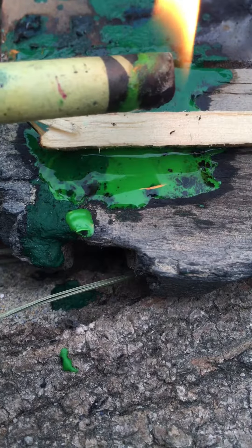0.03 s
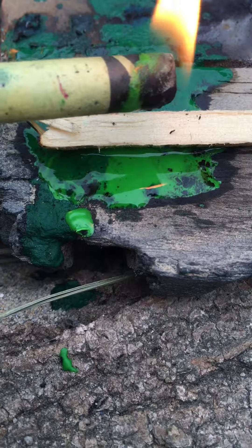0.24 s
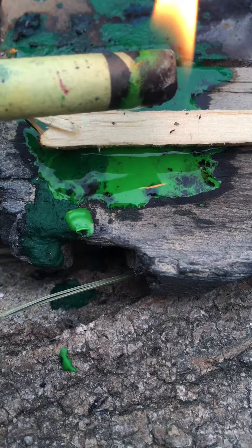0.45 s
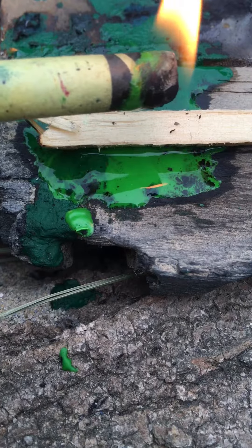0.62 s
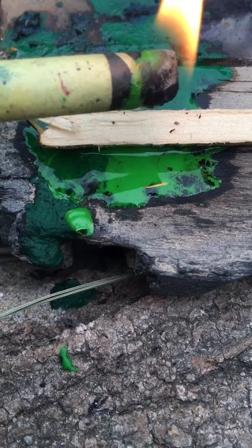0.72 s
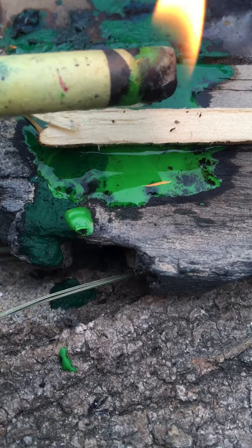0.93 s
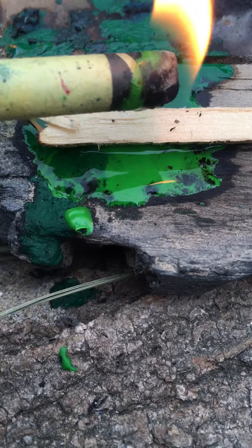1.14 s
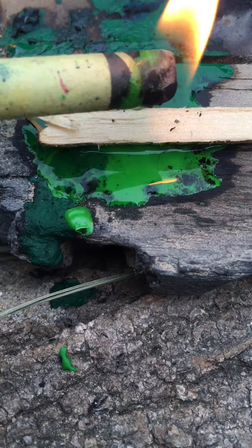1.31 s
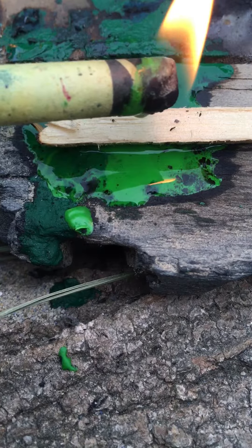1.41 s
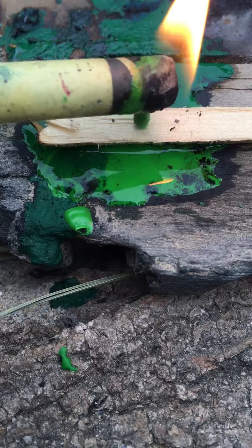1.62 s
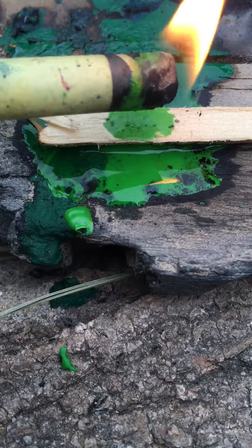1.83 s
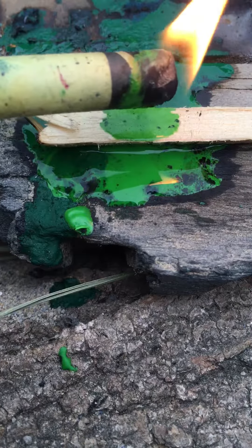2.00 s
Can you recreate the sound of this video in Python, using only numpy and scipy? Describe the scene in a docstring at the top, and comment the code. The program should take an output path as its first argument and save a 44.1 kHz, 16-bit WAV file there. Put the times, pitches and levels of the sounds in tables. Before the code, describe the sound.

Burning wax crayon crackles with dry bright snaps and faint fizz over a low outdoor rumble

```python
"""Tiny bubbles burst with dry, bright snaps in the melt of a wax crayon burning close by, outdoors.
Each snap is one coloured pressure pulse with a short noise spray and a faint return.
Coloured noise makes the melt's faint fizz, the flame's soft sputters and the sizzle as a drop runs off.
Behind them a distant motor hums as a stack of sines in rumbling noise, and a thin high whistle,
a wavering sine, comes twice."""
import sys
import numpy as np
from scipy import signal
from scipy.fft import rfft, irfft
from scipy.io import wavfile

SR = 44100
rng = np.random.default_rng(int(sys.argv[2]) if len(sys.argv) > 2 else 0)


def dump_mix(stems):
    """Bounce the given channels to the path in sys.argv[1] as a 16-bit WAV at rate SR."""
    frames = np.atleast_2d(stems).T  # one column per channel
    limited = np.clip(frames, -1, 1)  # hard clip at full scale
    pcm = np.round(limited * 32767).astype(np.int16)
    wavfile.write(sys.argv[1], SR, pcm)


N = 90757
T = np.arange(N) / SR  # time in seconds
HZ = np.fft.rfftfreq(N, 1 / SR)  # frequency of each spectrum bin
NOISE_TOP_HZ = 15850  # the coloured noises and the ticks stop here


def amp(db):
    """Decibels to gain."""
    return 10 ** (np.asarray(db) / 20)


def unit(x):
    """Scales to rms 1."""
    return x / np.sqrt(np.mean(x ** 2) + 1e-20)


def colour(points, hz):
    """Reads a spectrum in dB on a log-frequency axis."""
    point_hz, db = np.transpose(points)
    return np.interp(np.log(hz + 1), np.log(point_hz), db)


def curve(rows, column=1):
    """Reads one column of a table over time, with straight lines between rows."""
    rows = np.array(rows)
    return np.interp(T, rows[:, 0], rows[:, column])


def add(mix, start_s, sound):
    """Mixes a sound in at a time, cut off at the end of the scene."""
    part = mix[max(round(start_s * SR), 0):][:len(sound)]
    part += sound[:len(part)]


def filtered(x, points):
    """Colours a signal without shifting its phase, up to the top of the noise band."""
    gain = amp(colour(points, HZ)) * (HZ < NOISE_TOP_HZ)
    return irfft(rfft(x) * gain, N)


def noise(points, grain_db=0):
    """Coloured noise of rms 1, made of grains of uneven size."""
    grain_size = amp(grain_db * rng.standard_normal(N))
    return unit(filtered(rng.standard_normal(N) * grain_size, points))


def drift(rate_hz):
    """Random motion of rms 1, mostly slower than rate_hz."""
    lowpass = (HZ > 0) / (1 + (HZ / rate_hz) ** 4)
    return unit(irfft(rfft(rng.standard_normal(N)) * lowpass, N))


def narrow(hz, width_hz):
    """Noise in a resonance that follows hz: two random motions ride on a cosine and a sine."""
    phase = 2 * np.pi * np.cumsum(hz * np.ones(N)) / SR
    return unit(drift(width_hz / 2) * np.cos(phase) + drift(width_hz / 2) * np.sin(phase))


# Colour of the outdoor rumble and air. Each row: frequency in Hz, relative level in dB per Hz.
OUTDOOR_COLOUR = [(20, -4), (31, -22), (41, -9), (52, 5), (68, -5), (90, 2.5), (125, -8), (160, -5.5),
                  (210, -12), (280, -17.5), (390, -21), (480, -28.5), (700, -36), (1050, -38.5),
                  (1450, -47.5), (2000, -47), (2800, -48), (3300, -54.5), (3900, -49.5), (5000, -64),
                  (6500, -54.5), (8500, -60), (15500, -56.5)]
# Slow swell of the bass. Each row: time in seconds, gain in dB.
BASS_SWELL = [(0, -35.5), (.5, -40.5), (.9, -38), (1.05, -33.5), (1.3, -32.5), (1.42, -38), (1.55, -32.5),
              (1.72, -36.5), (1.87, -36.5), (2.06, -47)]
BASS_EDGE_HZ, AIR_DB = 170, -35.5


def outdoors():
    """Rumble whose bass swells slowly under steady air noise, split from one coloured noise."""
    whole = noise(OUTDOOR_COLOUR)
    lowpass = signal.butter(2, BASS_EDGE_HZ, fs=SR, output="sos")
    bass = signal.sosfiltfilt(lowpass, whole)
    air = whole - bass
    return bass * amp(curve(BASS_SWELL)) + air * amp(AIR_DB)


# Harmonics of the motor hum. Each row: multiple of the motor's pitch, rms level in dB.
HUM_HARMONICS = [(1, -40.5), (2, -38.5), (3, -63), (4, -61), (5, -60.5), (6, -64.5), (7, -67)]
# Motor tones of fixed pitch. Each row: frequency in Hz, rms level in dB.
WHINE_TONES = [(1109, -77), (1809, -86.5), (1922, -78), (2509, -82.5)]
MOTOR_HZ, MOTOR_WAVER = 58.4, 0.0037  # waver: rms share of the pitch


def motor():
    """A distant motor's harmonics waver together in pitch, under thin tones of fixed pitch."""
    phase = 2 * np.pi * np.cumsum(MOTOR_HZ * (1 + MOTOR_WAVER * drift(3.4))) / SR
    out = np.zeros(N)
    for multiple, db in HUM_HARMONICS:
        level = amp(db + 0.66 * drift(5.5))
        out += level * np.sin(multiple * phase + 2 * np.pi * rng.random())
    for hz, db in WHINE_TONES:
        level = amp(db + 0.5 * drift(2.4))
        out += level * np.sin(2 * np.pi * (hz * T + rng.random()))
    return np.sqrt(2) * out  # peak to rms level


# Thin whistles. Each row: start in seconds, length in seconds, peak level in dB before swell and
# flutter, centre pitch in Hz.
WHISTLE_CALLS = [(.208, .16, -68, 4185), (1.428, .176, -67.5, 4150)]
WHISTLE_RISE_S, WHISTLE_FADE_S, WHISTLE_TAIL_DB = 0.02, 0.2, -2
WHISTLE_SWELL_DB, WHISTLE_FLUTTER_DB, WHISTLE_WAVER_HZ = 3, 3, 32  # flutter and waver are rms


def whistles():
    """A thin sine, fluttering in level and pitch, swells, eases, then lingers faintly."""
    out = np.zeros(N)
    for start_s, length_s, db, hz in WHISTLE_CALLS:
        since_start = T - start_s
        since_end = since_start - length_s
        swell = np.sin(np.pi * np.clip(since_start / length_s, 0, 1) ** 2)
        rise = np.clip(since_start / WHISTLE_RISE_S, 0, 1)
        tail = amp(WHISTLE_TAIL_DB) * np.exp(-abs(since_end) / WHISTLE_FADE_S)
        shape = rise * np.where(since_end < 0, 1, tail)
        pitch = hz + WHISTLE_WAVER_HZ * drift(86)
        tone = np.sin(2 * np.pi * np.cumsum(pitch) / SR)
        level = amp(db + WHISTLE_SWELL_DB * swell + WHISTLE_FLUTTER_DB * drift(72))
        out += level * shape * tone
    return out


# Soft sputters of the flame. Each row: start in seconds, length in seconds, level in dB.
SPUTTER_PUFFS = [(0.372, 0.16, -59), (0.983, 0.019, -48), (1.596, 0.16, -54.5), (1.802, 0.12, -61.5)]
# Colour of a sputter. Each row: frequency in Hz, relative level in dB.
SPUTTER_COLOUR = [(200, 6), (700, -2), (1400, -2), (2400, -2), (3400, -5.5), (4700, -14.5), (5400, -16),
                  (7200, -1), (8200, -27), (13000, -26), (16000, -25)]


def sputters():
    """Short, duller puffs of grainy noise from the flame, quick to rise and slower to fall."""
    puffs = np.zeros(N)
    for start_s, length_s, db in SPUTTER_PUFFS:
        progress = np.clip((T - start_s) / length_s, 0, 1)
        puffs += amp(db) * abs(np.sin(np.pi * progress ** 0.35))
    return puffs * noise(SPUTTER_COLOUR, grain_db=7) * amp(0.95 * drift(77))


# Sizzle of the drop. Each row: time in seconds, level in dB, resonance in Hz.
SIZZLE_PATH = [(1.55, -73.5, 5380), (1.615, -52.5, 5400), (1.665, -56.5, 5380), (1.70, -59, 5880),
               (1.735, -53.5, 6840), (1.765, -54, 7500), (1.80, -55.5, 5970), (1.88, -55, 5800),
               (1.91, -63, 6050), (2.06, -64, 6300)]
# Colour of its noise. Each row: frequency in Hz, relative level in dB.
SIZZLE_NOISE = [(1000, 2), (4500, -12.5), (5600, 4), (7200, 4.5), (7900, 2), (8700, 6.5), (9500, 0),
                (11100, 3.5), (11800, 0.5), (13000, 3), (15500, -0.5)]
RESONANCE_WIDTH_HZ, RESONANCE_DB = 820, -3.5  # level against the noise at the loudest moment


def sizzle():
    """The drop sizzles as it runs off; a wandering resonance stands out while it is loudest."""
    level_db = curve(SIZZLE_PATH)
    resonance = narrow(curve(SIZZLE_PATH, column=2), RESONANCE_WIDTH_HZ)
    resonance *= amp(RESONANCE_DB + 1.1 * (level_db - level_db.max()))
    body = noise(SIZZLE_NOISE, grain_db=6) + resonance
    started = T > SIZZLE_PATH[0][0]
    return body * amp(level_db + 1.9 * drift(70)) * started


# Colour of a bubble's snap, also used by the ticks. Each row: frequency in Hz, relative level in dB.
SNAP_COLOUR = [(100, -50), (450, -11.5), (1000, -13.5), (1700, -21.5), (2600, -14.5), (3500, -20),
               (4900, -19), (5700, -9.5), (6700, -9), (7800, -18), (9000, -14), (10300, -13.5), (11800, -2),
               (13500, -3), (15500, -3.5), (17000, -13)]
# Level of the melt's fizz. Each row: time in seconds, level in dB.
FIZZ_LEVEL = [(0, -66), (.18, -68), (.378, -65.5), (.39, -59), (.55, -61), (.77, -61), (.80, -66),
              (.895, -66), (.905, -61), (1.2, -60.5), (1.55, -61), (2.06, -61)]
# Colour of the fizz. Each row: frequency in Hz, relative level in dB.
FIZZ_NOISE = [(500, 3.5), (2700, 6.5), (4800, 4.5), (5800, 11), (6900, 8), (8000, 2.5), (9700, 5.5),
              (10500, 0.5), (11800, 7.5), (15500, 5)]
TICKS_PER_S, TICK_DB, TICK_RANGE_DB = 30, -38, 10  # loudest tick and spread below it, before colouring


def fizz():
    """The melt fizzes as grainy noise, with scattered ticks from the smallest bubbles."""
    hiss = noise(FIZZ_NOISE, grain_db=4) * amp(curve(FIZZ_LEVEL) + 0.42 * drift(40))
    tick_here = rng.random(N) < TICKS_PER_S / SR
    ticks = tick_here * amp(TICK_DB - TICK_RANGE_DB * rng.random(N))
    return hiss + filtered(ticks, SNAP_COLOUR)


BODY_OCTAVES, BASS_HZ = 0.7, 1760  # width of the body boost; corner of the extra bass
SMEAR_S = 0.000188  # delay of the highest treble


def snap(body_db, body_hz, bass_db, size=2048):
    """A bursting bubble's sharp pressure pulse, its treble slightly spread in time."""
    hz = abs(np.fft.fftfreq(size, 1 / SR)) + 1
    body = body_db * np.exp(-(np.log2(hz / body_hz) / BODY_OCTAVES) ** 2)
    bass = bass_db / (1 + (hz / BASS_HZ) ** 2)
    log_gain = np.log(amp(colour(SNAP_COLOUR, hz) + body + bass))
    # minimum phase: the energy comes as early as the colour allows
    pulse = np.fft.ifft(np.exp(np.conj(signal.hilbert(log_gain)))).real
    # the delay grows in proportion to frequency
    smear = np.exp(-2j * np.pi * SMEAR_S * hz[:size // 2 + 1] ** 2 / SR)
    return irfft(rfft(pulse) * smear, size)


SPRAY_S, SPRAY_DB = 0.00073, -5.5  # scatter straight after a snap: decay time, energy against the snap
ECHO_S, ECHO_DB = 0.0073, -29  # faint return from nearby: decay time, energy against the snap


def scatter():
    """The direct pulse, then decaying noise for the spray and the faint return."""
    t = np.arange(SR // 20) / SR
    out = np.zeros(len(t))
    for db, decay_s in [(SPRAY_DB, SPRAY_S), (ECHO_DB, ECHO_S)]:
        shape = np.exp(-t / decay_s) * (1 - np.exp(-t / SPRAY_S))
        out += amp(db) * unit(rng.standard_normal(len(t)) * shape)
    out /= np.sqrt(len(t))  # rms to total energy
    out[0] = 1  # the snap itself
    return out


# Bursting bubbles. Each row: start in seconds, level in dB, body boost in dB, body pitch in Hz,
# extra bass in dB.
BUBBLES = [(.0022, -11.5, 2.5, 6500, 0), (.0365, -24, 8, 7500, 1), (0.148, -27, 2, 7000, 2),
           (.2775, -16.5, -1.5, 7000, 1), (.3845, 6.5, 8, 7460, -5.5), (.3856, -8, 5, 6500, 3),
           (0.387, -8, 10, 3000, 7), (.4695, -27, 9, 7000, 4), (.5060, -24.5, 7, 8000, 0),
           (0.535, -32, 15, 5200, 0), (0.6043, -5, 4, 5700, -1), (.6057, 1, 4.5, 5700, 12),
           (.6975, -28, -5, 6200, 0), (0.7739, -9, 0, 5200, -7), (.9010, -0.5, -1.5, 6200, -9),
           (0.9021, -10.5, -5, 6200, 4), (1.0397, -5, -3.5, 6200, -10), (1.0708, -23, -2, 6200, 0),
           (1.0725, -9, -2, 6200, -10), (1.0932, -19, -2, 6200, 1), (1.1205, -29, 0, 6200, 0),
           (1.1888, -13, 9.5, 4300, -6), (1.1895, 1, 3.5, 2700, -1), (1.3547, -2, 1, 4500, -2),
           (1.3603, -10.5, 6, 2700, 4), (1.5845, -25, 6, 6200, 3), (1.6020, -24, 11, 5500, 6),
           (1.622, -25, 8, 5500, 6), (1.7690, -13, 3, 8000, -2)]


def pops():
    """Each bubble snaps, followed by a millisecond of spray and a faint echo."""
    out = np.zeros(N)
    for start_s, db, body_db, body_hz, bass_db in BUBBLES:
        burst = signal.fftconvolve(snap(body_db, body_hz, bass_db), scatter())
        add(out, start_s, amp(db) * burst)
    return out


def scene():
    """The burning crayon in front of the motor, the whistle and the outdoor rumble."""
    background = outdoors() + motor() + whistles()
    crayon = sputters() + sizzle() + fizz() + pops()
    return (background + crayon)[None]


def record(dry):
    """Limits the band with a steep, symmetric low-pass at 16650 Hz."""
    lowpass = signal.firwin(255, 16650, window=("kaiser", 9), fs=SR)
    return signal.oaconvolve(dry, lowpass[None], "same")


dry = scene()
out = record(dry)
dump_mix(out)
```